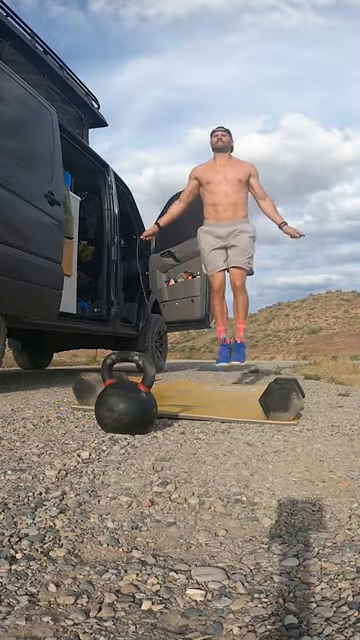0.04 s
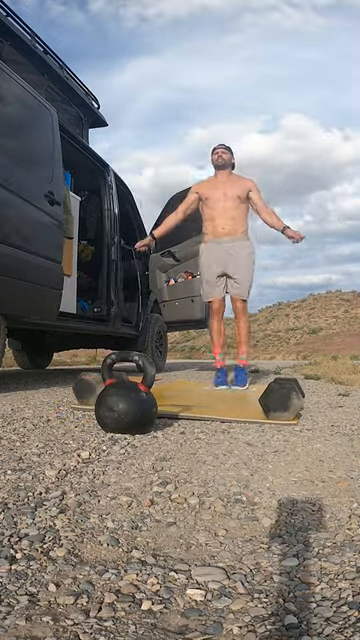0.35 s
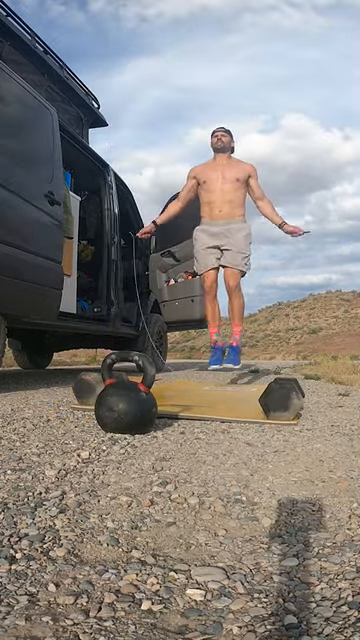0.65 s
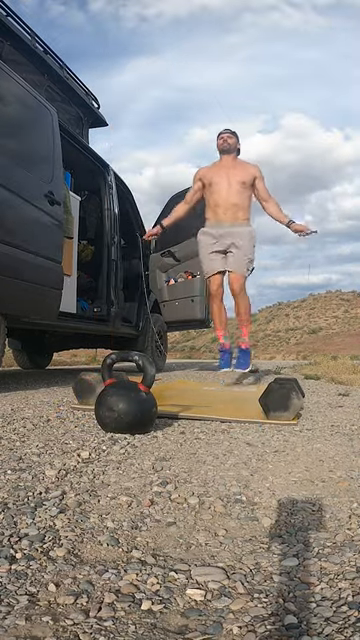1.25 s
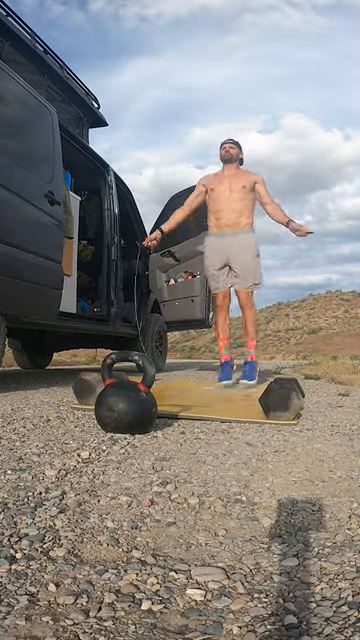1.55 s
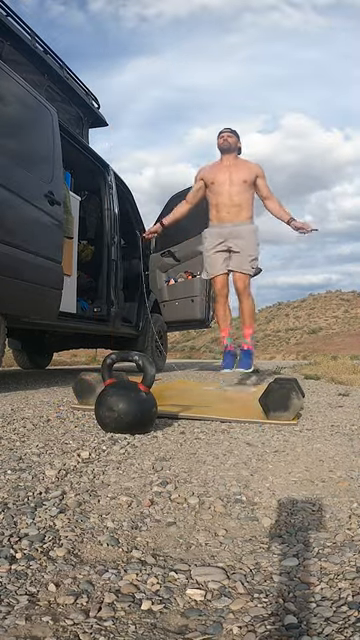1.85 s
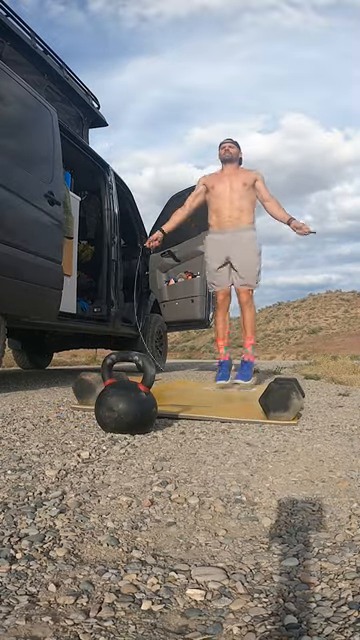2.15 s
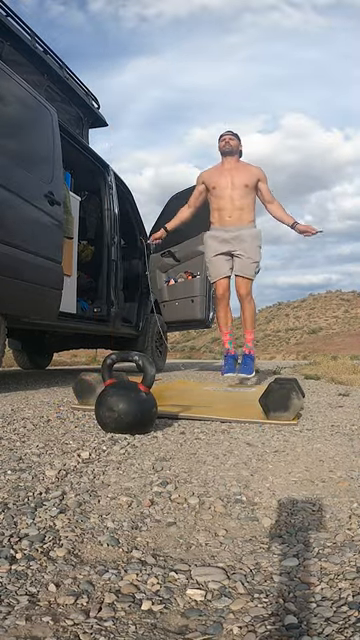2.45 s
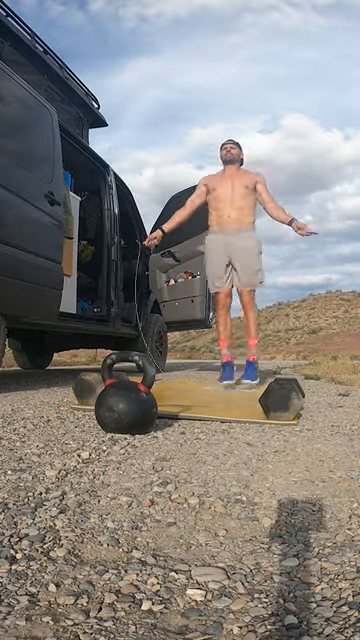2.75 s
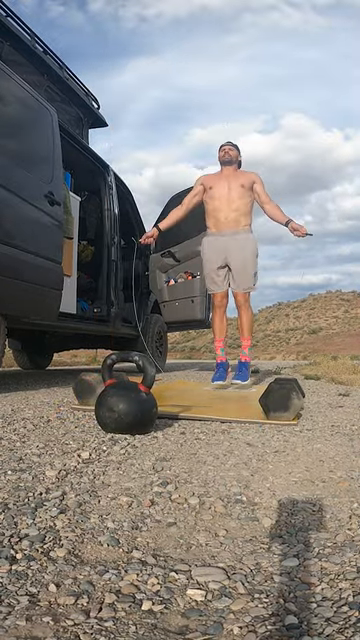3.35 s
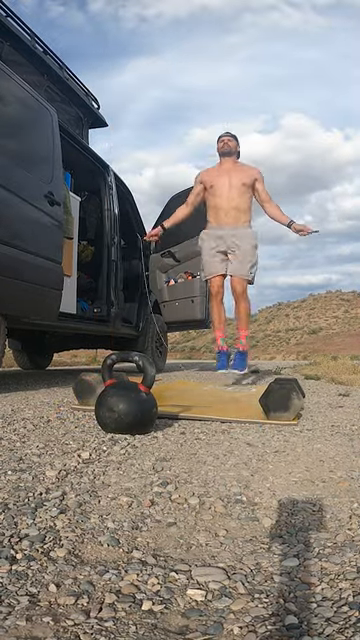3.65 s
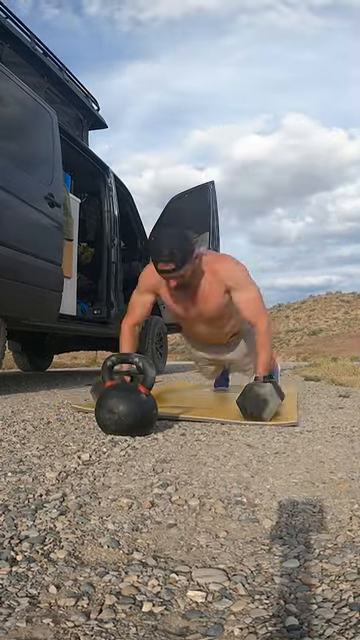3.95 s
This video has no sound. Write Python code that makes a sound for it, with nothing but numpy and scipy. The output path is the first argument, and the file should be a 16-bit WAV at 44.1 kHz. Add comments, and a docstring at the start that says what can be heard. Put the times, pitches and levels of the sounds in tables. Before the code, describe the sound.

A skipping rope whistles through the air and slaps a mat twice per jump. Shoes land after each pair with a small gravel crunch underneath. The rhythm stays steady outdoors, while light wind rumbles on the microphone.

```python
"""Double-unders with a thin skipping rope on a mat laid over gravel, outdoors.
From the start, light wind buffets the microphone. In each jump the rope sheds vortices and whistles
round, slaps the mat, is whipped round at its fastest and slaps the mat again. Then both shoes land,
the gravel crunches under the mat, and the soles roll and push off. The cycle repeats about every 0.6 s."""
import sys
import numpy as np
from scipy import signal
from scipy.fft import rfft, irfft
from scipy.io import wavfile

SR = 44100
rng = np.random.default_rng(int(sys.argv[2]) if len(sys.argv) > 2 else 0)


def put_to_file(sound):
    """Save the sound as 16-bit audio at rate SR, in the file named by the first command-line argument."""
    columns = np.atleast_2d(sound).T  # one column per channel
    safe = np.clip(columns, -1, 1)
    whole_steps = np.round(safe * 32767)
    wavfile.write(sys.argv[1], SR, whole_steps.astype(np.int16))


N = 176400
TIME = np.arange(N) / SR
AGE = np.arange(SR // 4) / SR  # seconds since a contact


def from_db(db):
    """Amplitude ratio of a level in decibels."""
    return 10 ** (np.asarray(db) / 20)


def rms_one(x):
    """Normalisation to unit power."""
    return x / np.sqrt(np.mean(x ** 2) + 1e-20)


def add(out, start_s, sound):
    """Superposition: a sound joins the mix at its start time."""
    i = max(int(start_s * SR), 0)
    out[i:i + len(sound)] += sound[:max(N - i, 0)]


def colour(x, spectrum):
    """Minimum-phase filtering to a spectral shape, at unit power gain."""
    size = 2 * len(x)
    hz, db = np.transpose(spectrum)
    bin_hz = np.arange(size // 2 + 1) * SR / size
    gain = rms_one(from_db(np.interp(np.log(bin_hz + 1e-9), np.log(hz), db)))
    cepstrum = irfft(np.log(gain))
    cepstrum[1:size // 2] *= 2  # folding the cepstrum makes the filter causal
    cepstrum[size // 2 + 1:] = 0
    return irfft(rfft(x, size) * np.exp(rfft(cepstrum)))[:len(x)]


def noise(spectrum):
    """Stationary coloured noise of unit power."""
    return rms_one(colour(rng.standard_normal(N), spectrum))


def drift(rate_hz):
    """Random modulation: low-passed noise of unit spread, limited to +-2."""
    lowpass = signal.butter(2, rate_hz, fs=SR, output="sos")
    return np.clip(rms_one(signal.sosfilt(lowpass, rng.standard_normal(N))), -2, 2)


def envelope(curve):
    """Gain over time, interpolated in decibels."""
    return from_db(np.interp(TIME, *np.transpose(curve)))


# Envelopes of the wind's deep rumble and of its buffeting higher up: time_s, level_db
RUMBLE_ENVELOPE = [(0, -30.5), (.28, -22), (.33, -27), (.8, -30.5), (.96, -24), (1.21, -27), (1.29, -40.5),
                   (1.6, -26), (2.05, -31.5), (2.75, -26.5), (4.0, -22.5)]
BUFFET_ENVELOPE = [(0, -35.5), (.23, -28.5), (.75, -32.5), (1.2, -31.5), (1.26, -45), (1.53, -34.5),
                   (2.22, -37.5), (2.35, -25), (2.42, -36.5), (2.62, -26), (2.98, -35), (3.06, -23),
                   (3.16, -44), (3.25, -25.5), (3.85, -28.5), (4.0, -22.5)]
# Spectra of the rumble, the buffeting and the distant air: frequency_hz, density_db
RUMBLE_SPECTRUM = [(12, -3), (30, 4.5), (65, 3), (115, -1), (160, -19), (8000, -140)]
BUFFET_SPECTRUM = [(70, -5), (125, 2), (300, -9.5), (450, -17.5), (700, -30), (12000, -112)]
AIR_SPECTRUM = [(500, -3), (1000, -6), (8000, -27.5), (16000, -70)]

def wind():
    """Turbulent pressure: gusts and eddies press on the microphone, over faint steady air."""
    rumble = from_db(1) * envelope(RUMBLE_ENVELOPE) * noise(RUMBLE_SPECTRUM)
    eddies = rms_one(from_db(3.5 * drift(rate_hz=30.6)))
    buffet = from_db(1.5) * envelope(BUFFET_ENVELOPE) * eddies * noise(BUFFET_SPECTRUM)
    return rumble + buffet + from_db(-59) * noise(AIR_SPECTRUM)


def grains(rise_s, fade_s, contacts_per_s=5000, spread_db=2):
    """Shot noise: a dying cloud of tiny random contacts."""
    count = len(AGE)
    sizes = from_db(spread_db * np.minimum(rng.exponential(1, count), 4))
    signs = rng.choice([-1, 1], count)
    contacts = rms_one(sizes * signs * (rng.random(count) < contacts_per_s / SR))
    return contacts * (1 - np.exp(-AGE / rise_s)) * np.exp(-(AGE / fade_s) ** 1.16)


# The shoes roll and push off: start_s, level_db
SCUFF_EVENTS = [(0.271, -23.5), (.447, -18), (1.521, -24), (1.556, -28.5), (2.675, -27.5), (2.756, -20),
                (3.547, -20.5), (3.973, -13)]
# Spectrum of the shifting mat: frequency_hz, density_db
SCUFF_SPECTRUM = [(80, -8.5), (200, 4), (480, -4), (700, -16), (1200, -32.5), (4000, -55), (16000, -92.5)]

def scuffs():
    """Friction: the mat shifts under the soles with a soft, dull sound."""
    out = np.zeros(N)
    for start_s, level_db in SCUFF_EVENTS:
        add(out, start_s, from_db(level_db) * grains(rise_s=0.0022, fade_s=0.013))
    return colour(out, SCUFF_SPECTRUM)


def mat_pop(pitch_hz, ring_s, swell_s, drop_hz, drop_s=0.00099):
    """Damped oscillation: a blow starts a few cycles that drop quickly to the mat's pitch."""
    cycles = pitch_hz * AGE + drop_hz * drop_s * (1 - np.exp(-AGE / drop_s))
    swell = 1 - np.exp(-AGE / swell_s)
    fade = np.exp(-(AGE / ring_s) ** 1.43)
    return -np.sin(2 * np.pi * cycles) * swell * fade / np.max(swell * fade)


# Spectrum of a sharp contact: frequency_hz, density_db
CRACK_SPECTRUM = [(300, 8.5), (900, 4), (2500, 1.5), (4000, -7.5), (7000, -23), (10000, -21.5),
                  (16000, -58)]

def crack(decay_s=0.00099):
    """Impact transient: a pressure spike and a brief spray of noise span a wide band."""
    burst = 0.36 * rng.standard_normal(len(AGE)) * np.exp(-AGE / decay_s)
    burst[0] -= 1.8
    return colour(burst, CRACK_SPECTRUM)


# The shoes land: start_s, level_db, pitch_hz, swell_s, crunch_db, brush_db, brush_hz
SHOE_LANDINGS = [(0.252, -16.5, 330, .0004, -25, -50, 3920), (0.8387, -11.5, 590, 0.00019, -21, -46, 3500),
                 (1.4218, -15, 555, 0.00097, -22.5, -45.5, 5100),
                 (2.0219, -13.5, 444, 0.0014, -23.5, -48, 4850),
                 (2.6066, -10, 532, 0.00071, -21, -34.5, 3670),
                 (3.2178, -13.5, 529, 0.00036, -25, -43, 4020), (3.8183, -14, 525, .002, -21, -40, 5950)]
# Spectrum of gravel crunching under the mat: frequency_hz, density_db
CRUNCH_SPECTRUM = [(100, -7.5), (280, 1.5), (550, -1), (850, -7), (1200, -19.5), (3800, -27), (5500, -38),
                   (9000, -50.5), (16000, -71.5)]
# Small stones click under the mat: start_s, level_db
STONE_CLICKS = [(1.4601, -29), (2.646, -26)]

def landings(thud_hz=121.1, thud_db=-29, thud_peak_s=0.023):
    """Inelastic impact: both shoes pat the mat, the body's weight sinks in and the gravel gives."""
    out, crunch = np.zeros(N), np.zeros(N)
    load = AGE / thud_peak_s * np.exp(1 - AGE / thud_peak_s)
    thud = from_db(thud_db) * load * np.sin(2 * np.pi * thud_hz * AGE)
    for start_s, level_db, pitch_hz, swell_s, crunch_db, *_ in SHOE_LANDINGS:
        pat = mat_pop(pitch_hz, ring_s=0.0042, swell_s=swell_s, drop_hz=160) + from_db(-9) * crack()
        add(out, start_s, from_db(level_db) * pat + thud)
        add(crunch, start_s, from_db(crunch_db) * grains(rise_s=0.00045, fade_s=0.019))
    for start_s, level_db in STONE_CLICKS:
        add(out, start_s, from_db(level_db) * crack())
    return out + colour(crunch, CRUNCH_SPECTRUM)


def sole_brushes(half_band_octaves=0.3):
    """Sliding friction: rubber brushes the mat in a bright band, different at each landing."""
    out = np.zeros(N)
    for start_s, *_, brush_db, brush_hz in SHOE_LANDINGS:
        low, high = brush_hz * 2.0 ** (half_band_octaves * np.array([-1, 1]))
        band = signal.butter(2, [low, high], "band", fs=SR, output="sos")
        brush = signal.sosfilt(band, grains(rise_s=0.00037, fade_s=0.013))
        bandwidth_gain = np.sqrt(SR / 2 / (high - low))
        add(out, start_s, from_db(brush_db) * bandwidth_gain * brush)
    return out


# Spectrum of the rope's wake: frequency_hz, density_db
WAKE_SPECTRUM = [(600, -18), (1500, 1), (3200, -1), (4500, -6.5), (5500, -12), (6700, -11), (8200, -22),
                 (10000, -24.5), (16000, -49)]

def wake_hiss():
    """Turbulence: the rope's wake radiates a grainy broadband hiss."""
    return rms_one(noise(WAKE_SPECTRUM) * from_db(0.5 * drift(rate_hz=170)))


def rope_sweeps(lead_s=0.031, half_length_s=0.031):
    """Flow noise: air hisses past the rope on its way down to the first slap of a jump."""
    first_slaps = [row[0] for row in ROPE_SLAPS[1::2]]
    swell = sum(np.exp(-((TIME - slap_s + lead_s) / half_length_s) ** 2) for slap_s in first_slaps)
    return from_db(-53.5) * swell * wake_hiss()


def vortex_tone(pitch_hz, width_hz):
    """Vortex shedding: a narrow, fluttering band of noise around a moving pitch."""
    lowpass = signal.butter(2, width_hz, fs=SR, output="sos")
    in_phase, quadrature = signal.sosfilt(lowpass, rng.standard_normal((2, N)))
    phase = 2 * np.pi * np.cumsum(pitch_hz) / SR
    band = in_phase * np.cos(phase) + quadrature * np.sin(phase)
    flutter = rms_one(np.hypot(in_phase, quadrature))
    return rms_one(band / np.sqrt(flutter + 0.5))  # partly evens out the flutter


# The whistle through one jump: time_from_second_slap_s, base_pitch_hz, level_db
WHISTLE_CYCLE = [(-.20, 1740, -55), (-.17, 1892, -44.5), (-.135, 1730, -53.5), (-.11, 1595, -45),
                 (-.08, 1670, -46.5), (-.04, 1900, -47), (0, 1847, -46), (0.031, 1570, -58.5),
                 (.055, 1600, -47), (.085, 1770, -52), (0.124, 1830, -46), (.16, 1494, -48.5),
                 (0.196, 1360, -53.5), (.23, 1630, -47), (.262, 1593, -41.5), (0.293, 1692, -49.5),
                 (0.326, 1480, -65), (0.363, 1440, -47.5)]
# The whistle's narrow core rings out: peak_s, boost_db
WHISTLE_SWELLS = [(.03, 10), (.433, 9.5), (.612, 8.5), (1.014, 12.5), (2.054, 11), (2.975, 9), (3.41, 8)]

def rope_whistle(jump_s=0.598, width_hz=61, wander_hz=46.3, swell_s=0.019):
    """Aeolian tone: the pitch follows the rope's speed; a faint octave and a hiss ride along."""
    second_slaps = [row[0] for row in ROPE_SLAPS[::2]]
    jumps = [second_slaps[0] - jump_s] + second_slaps + [second_slaps[-1] + jump_s]
    path = [(jump + offset_s, hz, db) for jump in jumps for offset_s, hz, db in WHISTLE_CYCLE]
    time_s, base_hz, level_db = np.transpose(path)
    whip_s, _, whip_hz, *_ = np.transpose(ROPE_WHIPS)
    speed = np.interp(TIME, whip_s, whip_hz / whip_hz.mean()) ** 0.94  # faster jumps whistle higher
    pitch_hz = speed * np.interp(TIME, time_s, base_hz) + wander_hz * drift(rate_hz=18.98)
    boost_db = sum(db * np.exp(-((TIME - peak_s) / swell_s) ** 2) for peak_s, db in WHISTLE_SWELLS)
    core = from_db(boost_db) * vortex_tone(pitch_hz, width_hz)
    skirt = from_db(-0.5) * vortex_tone(pitch_hz, width_hz=192)
    octave = from_db(-24) * vortex_tone(2 * pitch_hz, 2 * width_hz)
    turn_db = np.interp(TIME, time_s, level_db)
    hiss_db = -62.5 + 0.59 * (turn_db - turn_db.mean())
    return from_db(turn_db) * (core + skirt + octave) + from_db(hiss_db) * wake_hiss()


# The hard whip of each second turn: peak_s, level_db, pitch_hz, half_length_s, fall_hz_per_s
ROPE_WHIPS = [(0.137, -39, 2258, 0.044, 2490), (0.723, -33, 2314, 0.033, 5450),
              (1.314, -30, 2164, 0.019, 8090), (1.909, -29.5, 2165, 0.019, 7900),
              (2.504, -38.5, 2253, 0.03, 7540), (3.095, -33.5, 2290, 0.021, 9510),
              (3.704, -32, 2093, 0.022, 7580)]

def rope_whips(hiss_db=-49.5, hiss_half_length_s=0.047):
    """Vortex shedding at peak speed: a louder, higher swish that falls as the rope sweeps past."""
    out, hiss = np.zeros(N), wake_hiss()
    for peak_s, level_db, pitch_hz, half_length_s, fall_hz_per_s in ROPE_WHIPS:
        t = TIME - peak_s
        glide_hz = pitch_hz - fall_hz_per_s * np.clip(t, -0.022, 0.04)
        core = vortex_tone(glide_hz, width_hz=77)
        skirt = from_db(-6) * vortex_tone(glide_hz, width_hz=230)
        octave = from_db(-29) * vortex_tone(2 * glide_hz, width_hz=230)
        out += from_db(level_db) * np.exp(-(t / half_length_s) ** 2) * (core + skirt + octave)
        out += from_db(hiss_db) * np.exp(-(t / hiss_half_length_s) ** 2) * hiss
    return out


# The rope hits the mat, second and first pass in turn:
# start_s, pop_db, pitch_hz, ring_s, swell_s, crack_db, grit_db
ROPE_SLAPS = [(0.1706, -9, 390, 0.0024, 0.0011, -12, -22), (.474, -9, 396, 0.0018, 0.00065, -11.5, -23),
              (0.7593, -10, 478.4, 0.0026, .0028, -17, -24), (1.055, -8, 421, 0.0023, .0004, -11, -21.5),
              (1.3544, -10.5, 527, 0.0038, 0.0025, -16.5, -22),
              (1.6539, -10, 441, 0.0058, 0.00013, -13, -21.5),
              (1.9533, -12.5, 478, 0.0038, 0.0034, -19, -25.5),
              (2.256, -9, 462, 0.0038, 0.00041, -13, -23.5),
              (2.544, -9.5, 385, 0.0028, 0.00072, -11.5, -22),
              (2.8457, -9, 435, 0.0054, 0.00019, -15, -21.5),
              (3.1489, -13.5, 438, 0.0034, 0.0045, -13, -22.5),
              (3.4534, -8, 465, 0.0031, 0.00054, -12.5, -22), (3.756, -11.5, 500.5, .0034, .0035, -15, -21)]
# Spectrum of the stirred grit: frequency_hz, density_db
GRIT_SPECTRUM = [(120, -16), (300, 1.5), (550, 2.5), (850, -1.5), (1200, -7.5), (2200, -16.5),
                 (3800, -24.5), (7000, -34), (10500, -45), (16000, -48.5)]

def rope_slaps():
    """Impulsive excitation: each pass cracks on the mat, makes it pop and stirs the grit."""
    out, grit = np.zeros(N), np.zeros(N)
    for start_s, pop_db, pitch_hz, ring_s, swell_s, crack_db, grit_db in ROPE_SLAPS:
        pop = from_db(pop_db) * mat_pop(pitch_hz, ring_s, swell_s, drop_hz=583)
        add(out, start_s, pop + from_db(crack_db) * crack())
        add(grit, start_s, from_db(grit_db) * grains(rise_s=0.00076, fade_s=0.019))
    return out + colour(grit, GRIT_SPECTRUM)


def scene():
    """Superposition of rope, shoes and wind in one channel."""
    rope = rope_slaps() + rope_whistle() + rope_whips() + rope_sweeps()
    shoes = landings() + sole_brushes() + scuffs()
    return (rope + shoes + wind())[None]


def record(dry):
    """Band limiting: a steep low-pass is 70 dB down from 15.8 kHz."""
    return signal.sosfilt(signal.cheby2(12, 70, 15800, fs=SR, output="sos"), dry)


dry = scene()
out = record(dry)
put_to_file(out)
```